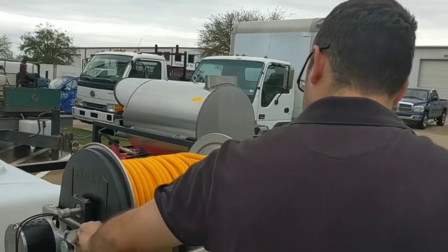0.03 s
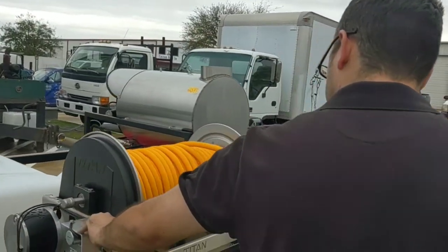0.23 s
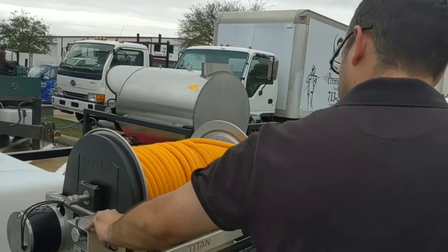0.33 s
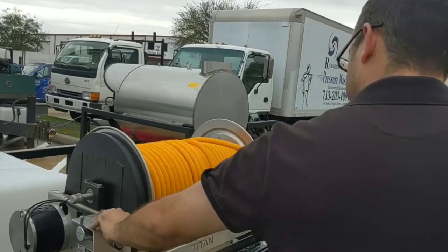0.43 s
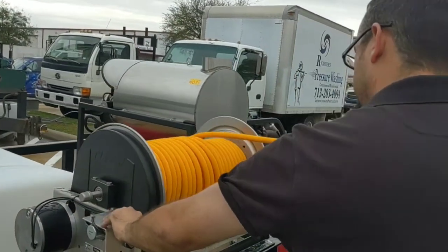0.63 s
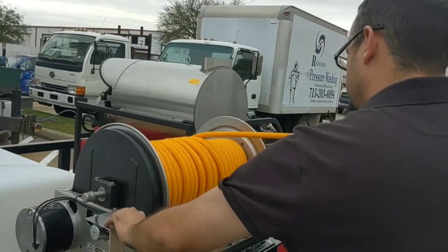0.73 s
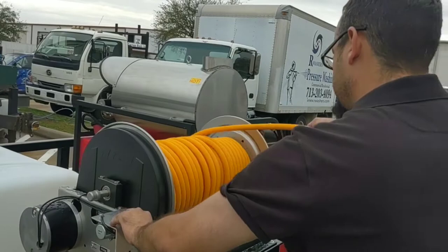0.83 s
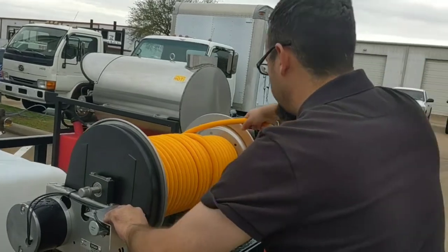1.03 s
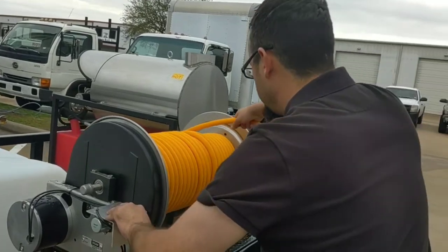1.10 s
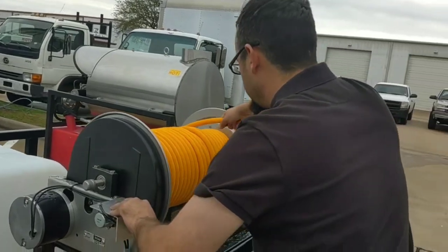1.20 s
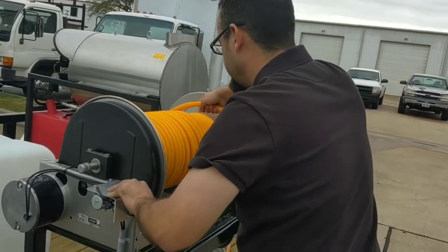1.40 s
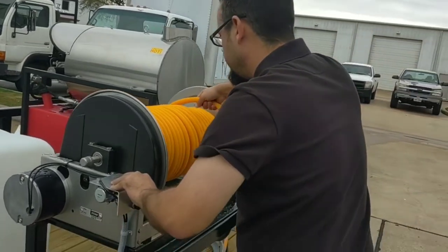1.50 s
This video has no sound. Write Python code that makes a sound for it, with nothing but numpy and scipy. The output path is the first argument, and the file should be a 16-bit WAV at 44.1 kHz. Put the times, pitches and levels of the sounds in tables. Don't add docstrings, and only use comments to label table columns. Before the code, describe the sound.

An electric hose reel clicks on, whirs up with chain rattle, then clinks off and coasts down outdoors

```python
import sys
import numpy as np
from scipy import signal
from scipy.fft import rfft, irfft, next_fast_len
from scipy.io import wavfile
from scipy.ndimage import map_coordinates

SR = 44100
rng = np.random.default_rng(int(sys.argv[2]) if len(sys.argv) > 2 else 0)


def makeup_ratio(level_db):
    decades = np.asarray(level_db, float) / 20
    return 10 ** decades


def dump(signal):
    limited = np.clip(np.atleast_2d(signal).T, -1, 1)
    pcm = np.round(limited * 32767).astype(np.int16)
    wavfile.write(sys.argv[1], SR, pcm)


N = 68355
T = np.arange(N) / SR

START_S, RISE_S = 0.2, 0.081
RELEASE_S = 0.929
FREE_S = 1.25
FULL_RATE = 208

# (time [s], hum level [dB], chain force [dB], drum load [dB])
DRIVE_LEVELS = [(0.23, -65, -35.5, -38.5), (0.288, -48, -31.5, -43.5), (0.336, -42, -30, -38),
                (0.394, -32.5, -27, -36), (0.429, -38.5, -24.5, -36.5), (0.53, -25.5, -25.5, -34.5),
                (0.618, -35.5, -26, -30), (0.692, -23, -27, -29.5), (0.921, -26.5, -26.5, -29),
                (0.94, -34, -25, -27), (1.004, -31.5, -33, -30.5), (1.05, -32.5, -30.5, -33.5),
                (1.094, -43, -31, -32.5), (1.192, -52, -36, -37), (1.28, -63, -43, -38),
                (1.345, -61, -50.5, -40), (1.43, -70, -55.5, -41.5), (1.55, -75, -51, -45)]
# (time [s], tooth rate [teeth/s])
TOOTH_RATE = [(0.23, 62), (0.272, 99), (0.29, 121), (0.33, 145), (0.36, 160), (0.42, 176), (0.53, 192),
              (0.618, 199), (0.692, 206), (0.92, 209), (0.95, 204), (1.01, 180), (1.08, 148), (1.16, 120),
              (1.2, 108), (1.26, 97), (1.36, 92), (1.55, 60)]
# (frequency [Hz], density [dB per Hz])
TAUT_HISS = [(2300, -95), (2900, -8.5), (3700, -9), (4500, 0), (5600, -2.5), (7200, -7), (12900, -3.5),
             (15800, -11.5)]
# (frequency [Hz], width [Hz], level over the hiss [dB])
TAUT_LINKS = [(12900, 1300, -1), (8300, 600, -6)]
# (frequency [Hz], width [Hz], level over the hiss [dB])
SLACK_LINKS = [(11700, 1300, 1), (9200, 600, -3), (3900, 1300, 0)]
# (frequency [Hz], density [dB per Hz])
DRUM_RUMBLE = [(200, -33), (300, -43), (420, -7.5), (672, -7.5), (786, -9), (1620, -9), (2400, -21),
               (3000, -47)]
# (frequency [Hz], width [Hz], level over the rumble [dB])
DRUM_SHELL = [(543, 15, 4.5), (578, 11, 6.5), (774, 13, 14.5), (805, 13.7, 14.5), (854, 19.5, 7),
              (912, 45, 3.5), (1249, 85, 0.5)]
# (multiple of tooth rate [1], level under the drum load [dB])
TOOTH_ORDERS = [(2, -16.5), (4.5, -13), (5.5, -15.5)]
# (frequency [Hz], width [Hz], level [dB])
STRUCK_MODE = [(105.6, 14.5, 0)]
# (frequency [Hz], width [Hz], level [dB])
GUARD_MODES = [(4250, 1000, -3.5), (5050, 500, -8), (5800, 520, 0)]
# (frequency [Hz], width [Hz], level relative to each other [dB])
FRAME_MODES = [(106, 6.6, 4.5), (176, 51, -7), (227, 110, -7)]
# (time [s], level [dB], frequency [Hz], t60 [s])
HOUSING_KNOCKS = [
    (0.2726, -31, 1688, 0.18),
    (0.4402, -25, 1784, 0.061),
    (0.49, -15.5, 1830, 0.028),
    (0.7225, -17, 1590, 0.051),
    (0.9273, -13.5, 1740, 0.015),
    (1.1358, -46, 1317, 0.016),
    (1.355, -47.5, 1670, 0.025),
]
# (time [s], level [dB], t60 [s])
BUTTON_CLICKS = [
    (0.0973, -42, 0.046),
    (0.1217, -40.5, 0.026),
    (0.2043, -35, 0.027),
    (0.2064, -12.5, 0.061),
]
# (frequency [Hz], density [dB per Hz])
SNAP_COLOUR = [(710, -30), (1200, -2.5), (2130, -9), (3340, -3), (5320, 4), (6390, -7.5), (7510, 4.5),
               (13000, 3.5), (15800, -3.5)]
# (frequency [Hz], level [dB], t60 [s])
SOLENOID_MODES = [(2100, -35, 0.099), (4660, -35, 0.16), (5600, -50, 0.043), (10300, -27, 0.019),
                  (12750, -19, 0.025)]
# (frequency [Hz], level [dB], t60 [s])
CONTACT_MODES = [(9260, 2, .07), (12355, 2, .06), (6500, 0, .02), (13200, 2, .03), (10300, -2, .025)]
# (time [s], level [dB], t60 [s])
COAST_TICKS = [(1.1395, -18, 0.025), (1.2548, -27, 0.018), (1.2615, -26, 0.012), (1.2657, -12, 0.018),
               (1.274, -25, 0.018), (1.2902, -24, 0.022), (1.3008, -25, 0.022), (1.3062, -29, 0.018),
               (1.3118, -24, 0.022), (1.3245, -35, 0.03), (1.3557, -37, 0.025), (1.377, -35, 0.1),
               (1.3915, -38, 0.04), (1.397, -32, 0.02), (1.4433, -39, 0.07), (1.4573, -35, 0.04),
               (1.4733, -29, 0.025), (1.4898, -32, 0.025), (1.4957, -31, 0.04), (1.516, -41, 0.04),
               (1.5246, -40, 0.04)]
# (frequency [Hz], density [dB per Hz])
COAST_TICK_COLOUR = [(1500, -30), (2600, -24), (3600, -0.5), (5000, 0.5), (7000, -7), (9000, -3.5), (11300, -0.5),
                     (15800, -14)]
# (frequency [Hz], left minus right level [dB])
PHONE_SHADOW = [(150, 1.5), (300, -2.5), (1000, -1), (3000, 3.5), (6500, 0.5), (8500, -5), (10500, -21.5),
                (15000, -14.5)]
# (frequency [Hz], share [0..1])
DIRECT_SHARE = [(200, .995), (350, .97), (700, .9), (1400, .6), (2800, .4), (14000, .35)]
# (frequency [Hz], density [dB per Hz])
YARD_COLOUR = [(15, -68), (25, -48), (82, -3), (205, -2), (342, -1), (769, -16.5), (3490, -20),
               (3880, -27.5), (15800, -44)]
# (frequency [Hz], side over mid level [dB])
YARD_WIDTH = [(30, -12), (100, -19), (400, -3.5), (1500, 3.5), (10000, -6.0)]
# (frequency [Hz], width [Hz], level [dB])
TREBLE_NOTCHES = [(2680, 130, -14), (3350, 110, -7)]


def unit(x):
    return x / np.sqrt(np.mean(x ** 2) + 1e-20)


def along(points, hz):
    f, v = np.transpose(points)
    return np.interp(np.log(hz + 1), np.log(f + 1), v)


def noise():
    return rng.standard_normal(N)


def wobble(rate):
    return map_coordinates(rng.standard_normal(int(N * rate / SR) + 4), [np.arange(N) * rate / SR])


def filtered(x, response):
    m = next_fast_len(N + SR // 2)
    return irfft(rfft(x, m) * response(np.fft.rfftfreq(m, 1 / SR)), m)[..., :N]


def rings(peaks, f):
    return sum(makeup_ratio(db) * 1j * f * w / (c * c - f * f + 1j * f * w) for c, w, db in peaks)


def decay(t, t60, rise):
    t = np.maximum(t, 0)
    return (1 - np.exp(-t / rise)) * makeup_ratio(-60 * t / t60)


def tone(hz, t=T):
    return np.sin(2 * np.pi * hz * t)


def tooth_strikes(turn):
    when = np.interp(np.arange(int(turn[-1])) + 0.12, turn, T)
    jitter_s, scatter_db = rng.standard_normal((2, len(when))) * [[0.0001], [2]]
    at = np.clip((when + jitter_s) * SR, 0, N - 1).astype(int)
    return np.bincount(at, makeup_ratio(scatter_db), N)


def smear(teeth, fall_s):
    return np.convolve(teeth, np.exp(-T[:SR // 50] / fall_s))[:N]


def chain(teeth, gate, slow):
    depth = np.clip(0.38 + 0.22 * slow, 0, 1) * np.where(T < FREE_S, 1, 0.25)
    hiss = unit((1 - depth + depth * gate) * noise())
    impacts = unit(smear(teeth, 0.0003) * noise())
    ticks = filtered(impacts, lambda f: 1 / (1 + (8000 / (f + 1)) ** 6))
    hiss = hiss + makeup_ratio(-10) * (T < FREE_S) * ticks
    taut, loose = [unit(filtered(hiss, lambda f: makeup_ratio(along(TAUT_HISS, f)) * (1 + rings(links, f))))
                   for links in (TAUT_LINKS, SLACK_LINKS)]
    body = filtered(taut, lambda f: 1 / (1 + (f / 6400) ** 12))
    body_db = -11 * np.clip((0.56 - T) / 0.3, 0, 1)
    taut = taut - body * (1 - makeup_ratio(body_db))
    slack = np.clip((T - 0.95) / 0.2, 0, 1)
    return (1 - slack) * taut + slack * loose


def drum(teeth, gate, rate, turn, phase, slow):
    rolling = (0.7 + 0.3 * gate) * makeup_ratio(1.2 * wobble(60)) * noise()
    rumble = unit(filtered(rolling, lambda f: makeup_ratio(along(DRUM_RUMBLE, f)) * (1 + rings(DRUM_SHELL, f))))
    orders = sum(makeup_ratio(db + 3.3 * wobble(21.07)) * np.sin(2 * np.pi * k * turn + 0.6 * wobble(24.04))
                 for k, db in TOOTH_ORDERS)
    orders = orders * 2 * (rate / FULL_RATE) ** 8
    overtone = makeup_ratio(-8 + 3.4 * wobble(18)) * 2 * slow * np.sin(2 * phase)
    slow_teeth = teeth * (rate < FULL_RATE / 1.6)
    low = unit(filtered(slow_teeth, lambda f: rings(STRUCK_MODE, f) ** 2))
    return rumble + orders + overtone + makeup_ratio(-11) * low


def guard(chain_db):
    shaking = makeup_ratio(1.5 * wobble(70)) * noise()
    rattle = unit(filtered(shaking, lambda f: rings(GUARD_MODES, f) ** 2))
    wake = np.clip((T - START_S - RISE_S) / 0.3, 0, 1) ** 2
    return rattle * wake * makeup_ratio(0.38 * np.minimum(chain_db + 40.5, 0))


def frame():
    def response(f):
        return rings(FRAME_MODES, f) * f ** 4 / (f ** 4 + 85 ** 4) / (1 + (f / 350) ** 4)
    return unit(filtered(noise(), response))


def drive():
    times, *levels = np.transpose(DRIVE_LEVELS)
    hum_db, chain_db, load_db = [np.interp(T, times, level) for level in levels]
    rate = np.interp(T, *np.transpose(TOOTH_RATE))
    slow = np.clip(1 - rate / FULL_RATE, 0, 1)
    turn = np.cumsum(rate) / SR
    phase = 2 * np.pi * turn + 0.12 * wobble(35)
    teeth = tooth_strikes(turn)
    gate = unit(smear(teeth, 0.0014))

    dip_db = -6 * np.exp(-((T - 0.951) / 0.008) ** 2)
    on = np.clip((T - START_S) / RISE_S, 0, 1) * makeup_ratio(dip_db)
    chain_part = makeup_ratio(chain_db + 0.5 + 0.7 * wobble(25.86)) * chain(teeth, gate, slow)
    rolling = drum(teeth, gate, rate, turn, phase, slow) + makeup_ratio(-2) * guard(chain_db)
    drum_part = makeup_ratio(load_db - 3) * rolling
    hum = makeup_ratio(hum_db + 1.5 * wobble(25.3)) * np.sqrt(2) * np.sin(phase)
    sway_db = 3 * np.exp(-((rate - 111) / 22.6) ** 2)
    frame_part = makeup_ratio(-45.5 + 0.47 * (load_db + 42.5) + sway_db) * frame()
    ring_on = makeup_ratio(-22) * decay(T - 0.957, 0.22, 0.0096) * tone(206)
    return ring_on + on * (chain_part + drum_part + hum + frame_part)


def knocks():
    out = 0
    for s, db, hz, t60 in HOUSING_KNOCKS:
        pair = tone(hz, T - s) + 0.37 * tone(1.3 * hz, T - s)
        out = out + makeup_ratio(db - 4) * decay(T - s, t60, 0.0005) * pair
    return makeup_ratio(4 * wobble(500)) * out


def snaps(events, early_s=0):
    return sum(makeup_ratio(db - 5) * decay(T - s + early_s, t60, 0.0008) for s, db, t60 in events)


def button():
    rub = makeup_ratio(-61.5) * (T > 0.119) * (T < START_S + RISE_S)
    spring_out = makeup_ratio(-14) * decay(T - RELEASE_S + 0.004, 0.06, 0.004)
    shape = snaps(BUTTON_CLICKS, 0.00025) + rub + spring_out
    return shape * unit(filtered(noise(), lambda f: makeup_ratio(along(SNAP_COLOUR, f)))) * makeup_ratio(1.3 * wobble(500))


def solenoid():
    return sum(makeup_ratio(db) * decay(T - 0.2056, t60, 0.00092) * tone(hz) for hz, db, t60 in SOLENOID_MODES)


def contact():
    out = 0
    for hz, db, t60 in CONTACT_MODES:
        first = decay(T - RELEASE_S, t60, 0.00057)
        bounce = makeup_ratio(-1) * (t60 > 0.05) * decay(T - RELEASE_S - 0.007, t60, 0.001)
        out = out + makeup_ratio(db) * (first + bounce) * tone(hz)
    return makeup_ratio(-23) * out


def coast_ticks():
    colour = unit(filtered(noise(), lambda f: makeup_ratio(along(COAST_TICK_COLOUR, f))))
    return snaps(COAST_TICKS) * colour * makeup_ratio(1.8 * wobble(500))


def microphones(x):
    z = signal.stft(x, nperseg=384)[2]
    scattered = signal.istft(z * np.exp(2j * np.pi * rng.random(z.shape)), nperseg=384)[1][:N]
    scattered = unit(scattered) * np.std(x)

    def share(f):
        return np.clip(along(DIRECT_SHARE, f), 0, 1)

    def shade(f):
        return makeup_ratio(along(PHONE_SHADOW, f))

    def lift(f):
        return 2 / np.sqrt(1 + shade(f) ** 2 + 2 * share(f) * shade(f))

    lag_s = -0.00012
    direct = filtered(x, lambda f: share(f) * np.exp(-2j * np.pi * f * lag_s))
    diffuse = filtered(scattered, lambda f: np.sqrt(1 - share(f) ** 2) * (f > 250))
    left = filtered(direct + diffuse, lambda f: lift(f) * shade(f))
    return np.array([left, filtered(x, lift)])


def yard():
    a, b = makeup_ratio(1.5 * wobble(12)) * rng.standard_normal((2, N))
    mid = filtered(a, lambda f: makeup_ratio(along(YARD_COLOUR, f)))
    side = filtered(b, lambda f: makeup_ratio(along(YARD_COLOUR, f) + along(YARD_WIDTH, f)))
    gain = makeup_ratio(-52.5) / np.sqrt(np.mean(mid ** 2))
    return gain * np.array([mid + side, mid - side])


def scene():
    reel = drive() + knocks() + button() + solenoid() + contact() + coast_ticks()
    return microphones(reel) + yard()


def top_cut(x):
    return signal.sosfilt(signal.butter(12, 16620, fs=SR, output="sos"), x)


def record(dry):
    def notches(f):
        return makeup_ratio(sum(db * np.exp(-((f - hz) / wide) ** 2) for hz, wide, db in TREBLE_NOTCHES))
    heard = filtered(dry, notches)
    held = heard / (1 + np.abs(heard / 0.62) ** 4) ** 0.25
    mix = filtered(held, lambda f: makeup_ratio(-43) + 1 / (1 + (f / 15750) ** 100))
    return top_cut(mix)


dry = scene()
out = record(dry)
dump(out)
```